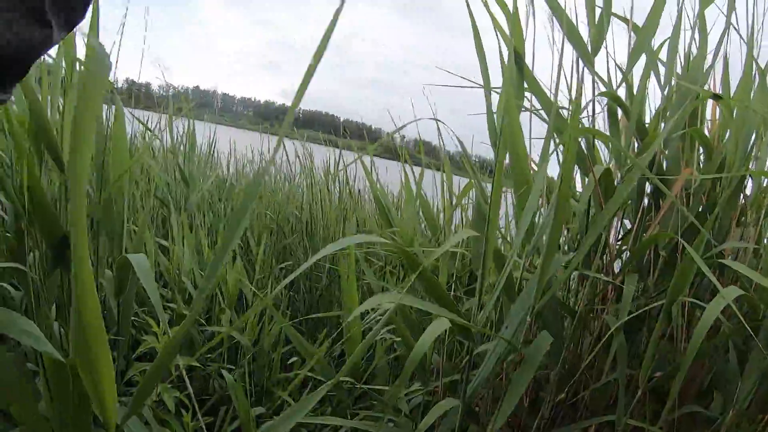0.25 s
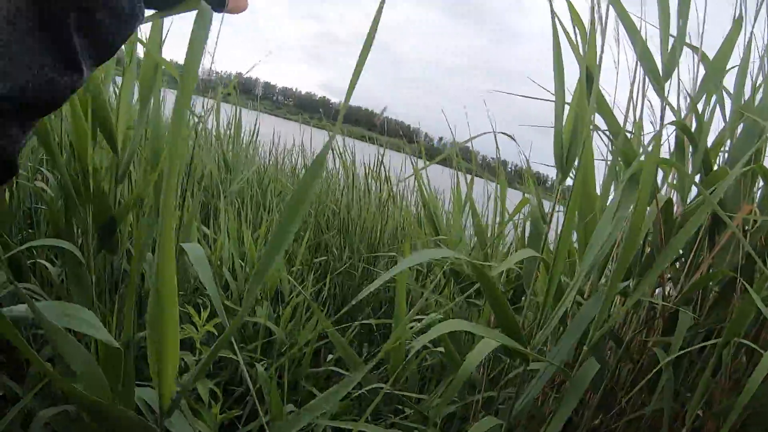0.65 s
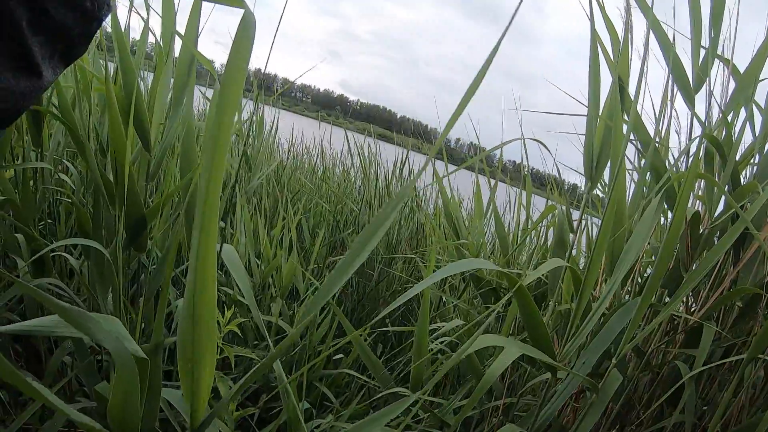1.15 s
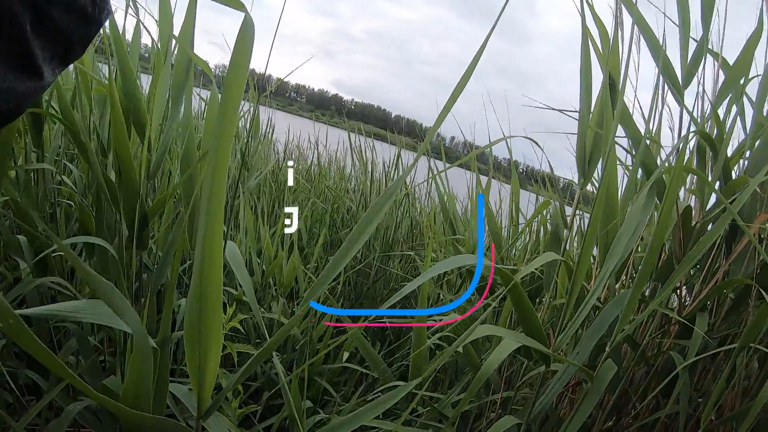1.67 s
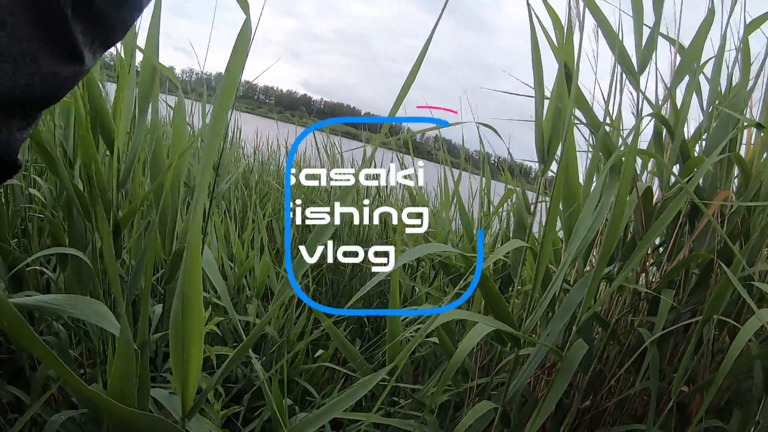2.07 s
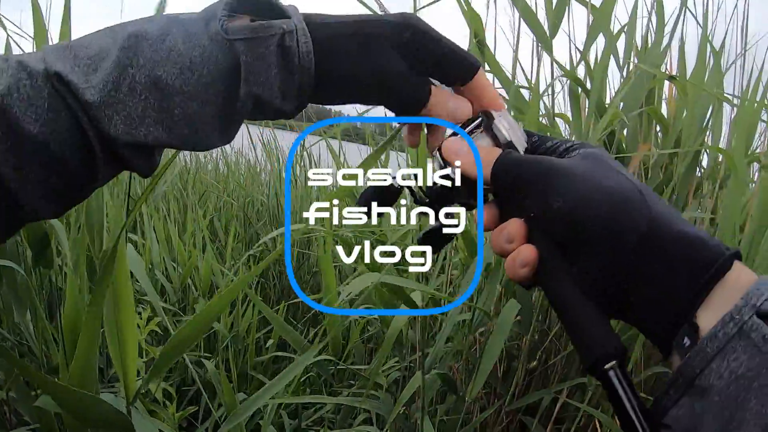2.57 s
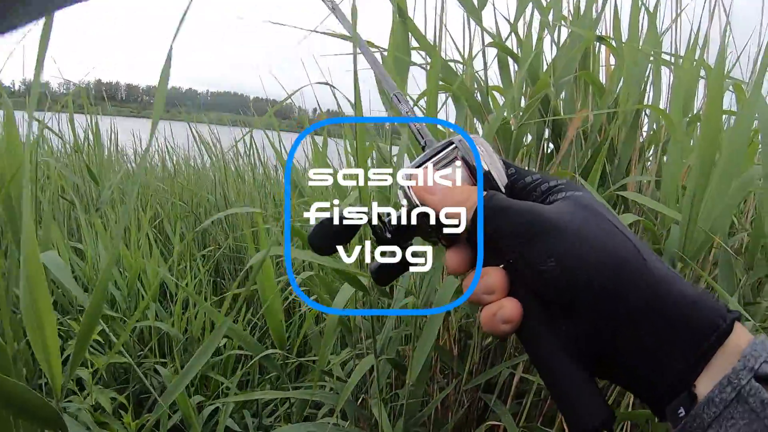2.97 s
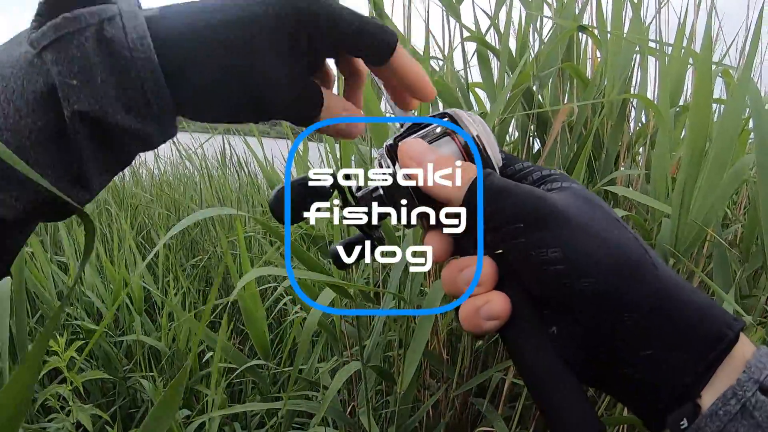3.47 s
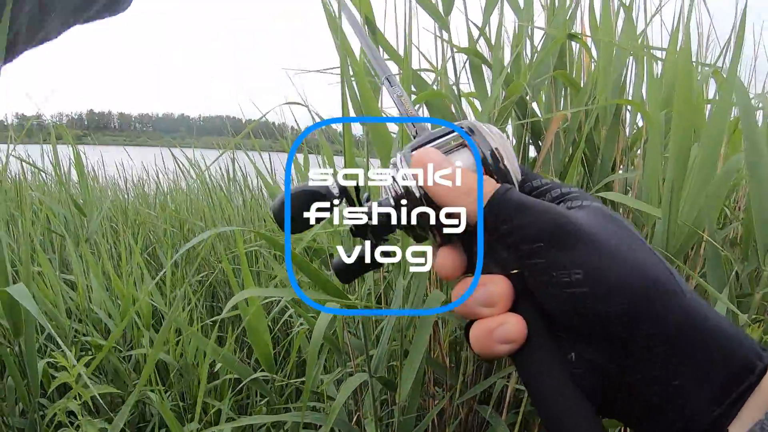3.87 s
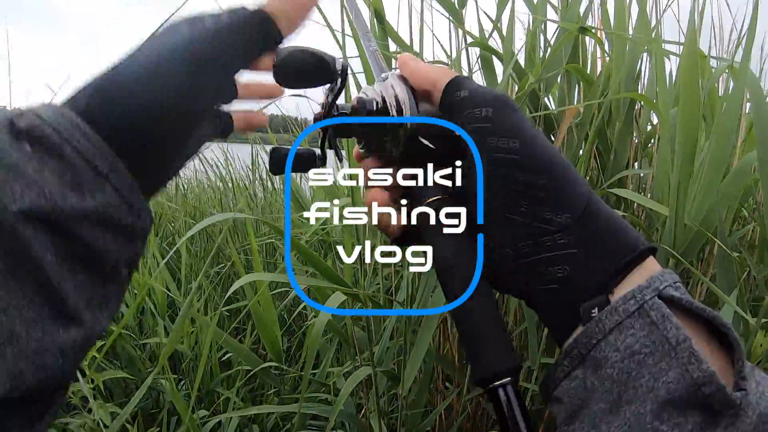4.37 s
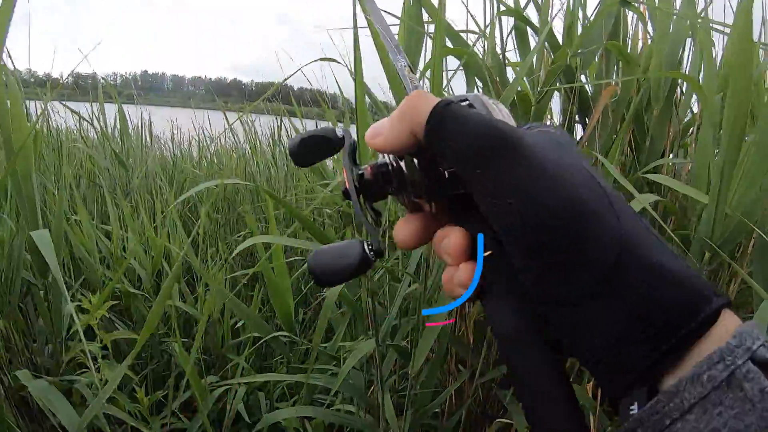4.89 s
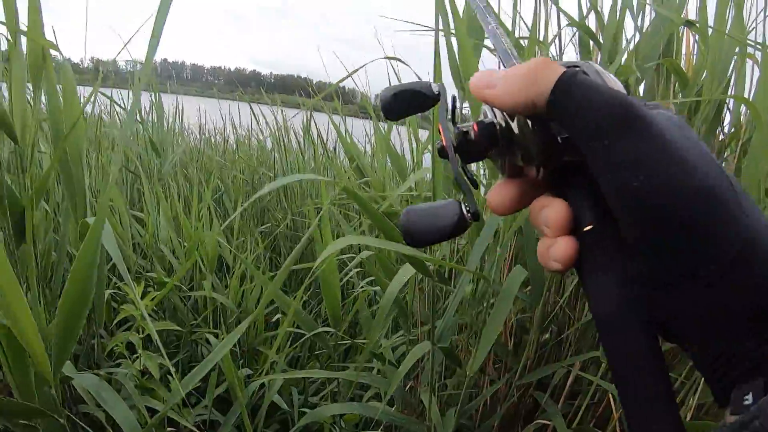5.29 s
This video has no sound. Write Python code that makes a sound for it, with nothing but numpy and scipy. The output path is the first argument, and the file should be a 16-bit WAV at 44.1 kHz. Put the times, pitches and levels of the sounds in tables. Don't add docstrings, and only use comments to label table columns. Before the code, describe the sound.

Close, quiet handling sounds among tall reeds: uneven dry rustling, sleeve scuffs, dull camera bumps and small knocks, over low lumpy wind and a barely heard distant drone. Midway, bright line ticks come in two clusters with heavier cloth rubbing between and after. A sharp metal reel click stands out late, then crisp taps and faint bird chirps close over continuing leaves. Open air, no room echo.

```python
import sys
import numpy as np
from scipy import signal
from scipy.fft import rfft, irfft, next_fast_len
from scipy.io import wavfile
from scipy.ndimage import uniform_filter1d

SR = 44100
rng = np.random.default_rng(int(sys.argv[2]) if len(sys.argv) > 2 else 0)


def elevation(decibels):
    levels = np.asarray(decibels, float)
    return 10 ** (levels / 20)


def pcm_store(signal):
    levels = np.round(np.clip(np.atleast_2d(signal), -1, 1) * 32767)
    wavfile.write(sys.argv[1], SR, levels.astype(np.int16).T)


N = 244024
SIZE = next_fast_len(N)
MEAN_SWAY_DB = -57


def in_time(rows):
    s, *columns = np.transpose(rows)
    return [np.interp(np.arange(N) / SR, s, c) for c in columns]


def at_hz(points, hz):
    f, value = np.transpose(points)
    return np.interp(np.log(hz + 1), np.log(f + 1), value)


def rms_one(x):
    return x / np.sqrt(np.mean(x ** 2) + 1e-20)


def drift(rate):
    pole = np.exp(-80 * np.pi * rate / SR)
    noise = rng.standard_normal(N // 40 + 2002)
    slow = signal.lfilter([1], [1, -2 * pole, pole * pole], noise)[2000:]
    return np.interp(np.arange(N) / 40, np.arange(len(slow)), rms_one(slow))


def ring(clicks, hz, t60_s):
    r = elevation(-60 / (t60_s * SR))
    w = 2 * np.pi * min(hz, 0.45 * SR) / SR
    return signal.lfilter([0, np.sin(w)], [1, -2 * r * np.cos(w), r * r], clicks)


def ports(shared, own):
    # frequency in Hz, phase by which the left leads in radians.
    port_phase = [(0, 0), (430, .2), (1290, 3.1), (1700, 5.4), (2240, 6.1), (4130, 6.6), (6000, 5.3),
                  (10100, 7.8), (16000, 7)]
    # frequency in Hz, share common to both ports 0-1.
    likeness = [(60, .8), (250, .7), (640, .45), (1400, .65), (3000, .6), (7000, .5), (14000, .3)]
    hz = np.fft.rfftfreq(SIZE, 1 / SR)
    alike = np.clip(at_hz(likeness, hz), 0, 1)
    left = rfft(shared, SIZE)
    common = alike * left * np.exp(-1j * at_hz(port_phase, hz))
    return np.array([left, common + np.sqrt(1 - alike ** 2) * rfft(own, SIZE)])


def grains(per_s, spread_db, decay_s):
    born = rng.random(N) < per_s * elevation(3 * drift(8)) / SR
    sizes = elevation(spread_db * np.minimum(rng.exponential(1, N), 4)) * born
    return 1 + signal.lfilter([1], [1, -np.exp(-1 / (decay_s * SR))], sizes)


def patches(spectrum, envelope, patchy_db, rate, bands_count):
    hz = np.fft.rfftfreq(SIZE, 1 / SR)
    low_hz, high_hz = spectrum[0][0], spectrum[-1][0]
    noise = ports(*(rng.standard_normal((2, N)) * envelope)) * elevation(at_hz(spectrum, hz))
    noise *= (hz > low_hz) & (hz < high_hz)
    place = bands_count * np.log(hz / low_hz + 1e-9) / np.log(high_hz / low_hz)
    total = np.zeros((2, N))
    for k in range(bands_count + 1):
        weight = np.clip(1 - np.abs(place - k), 0, 1)
        total += irfft(noise * weight, SIZE)[:, :N] * elevation(patchy_db * drift(rate))
    return rms_one(total)


def evened(x, span_s):
    power = uniform_filter1d(np.mean(np.atleast_2d(x) ** 2, axis=0), size=round(span_s * SR))
    return x / np.sqrt(power + 0.015)


def swells(s, hold_s, level_db, rise_db_per_s, fall_db_per_s, bed_db):
    t = np.arange(0, N, 64) / SR
    s = s[:, None]
    before_db = (s - t) * rise_db_per_s
    after_db = (t - s - np.abs(hold_s)[:, None]) * fall_db_per_s
    below_db = np.maximum(0, np.maximum(before_db, after_db))
    power = np.sum(elevation(level_db[:, None] - below_db) ** 2, axis=0)
    return 10 * np.log10(np.interp(np.arange(N) / SR, t, power) + elevation(bed_db) ** 2)


def add(track, s, sound, pan_db):
    at = round(s * SR)
    track[:, at:at + len(sound)] += elevation([[pan_db / 2], [-pan_db / 2]]) * sound[:N - at]


def wind():
    # start in seconds, hold in seconds, level in dB.
    gusts = [(0.04, 0.017, -47), (0.257, 0.018, -54), (0.48, .01, -55), (0.59, .22, -49.5),
             (0.93, 0.12, -48), (1.484, 0.25, -56.5), (1.795, 0.1, -53), (2.073, .05, -48.5),
             (2.345, .08, -46.5), (2.568, .02, -49.5), (2.76, .03, -48), (3.004, 0.09, -46.5),
             (3.34, 0.02, -39.5), (3.464, 0.083, -46.5), (3.69, .01, -46.5), (3.803, 0.11, -46.5),
             (4.136, .08, -55), (4.319, 0.017, -36), (5.004, 0.068, -57.5), (5.138, .29, -53.5),
             (5.52, .01, -53)]
    # time in seconds, level in dB.
    breeze = [(0, -57), (.85, -55.5), (.93, -63.5), (3.3, -52.5), (3.45, -57.5), (4.15, -53.5),
              (4.28, -51.5), (4.7, -55.5), (4.9, -59), (5.53, -57)]
    # frequency in Hz, density in dB per Hz.
    thump_spectrum = [(20, -31), (30, -20), (42, -5), (55, 4), (68, -10), (85, -19.5), (130, -17.5)]
    air_spectrum = [(41, -70), (70, -2.5), (102, -19.5), (124, -10.5), (161, -2), (192, -6), (609, -16.5),
                    (1050, -12), (1200, -17), (1560, -18), (2640, -120)]
    thump_db = swells(*np.transpose(gusts), rise_db_per_s=214, fall_db_per_s=196, bed_db=-64.5)
    thump = elevation(thump_db) * evened(patches(thump_spectrum, 1, patchy_db=4.0, rate=33, bands_count=1), 0.049)
    puffs = grains(30, 0.13, 0.0045)
    air = elevation(in_time(breeze)[0] + 4.0) * patches(air_spectrum, puffs, patchy_db=1.46, rate=24, bands_count=3)
    return thump * elevation([[-1.2], [1.2]]) + air


def drone():
    # time in seconds, low line in dB, whine in dB.
    engine = [(0.0, -69, -85), (0.52, -64, -57), (0.71, -59, -80), (1.19, -64.5, -64), (2.39, -49, -67),
              (3.27, -62.5, -54), (3.51, -58.5, -67), (4.39, -69, -55), (4.53, -62, -52), (4.95, -75, -56),
              (5.39, -55, -56.5), (5.53, -62, -88)]
    low_hz, whine_hz = 100, 430.4
    low_db, whine_db = in_time(engine)
    low, whine = rng.standard_normal((2, N))
    low = ring(ring(low, low_hz, 0.47), low_hz, 0.21)
    whine = ring(ring(whine, whine_hz, 0.061), whine_hz, 0.072)
    return elevation(low_db - 0.5) * evened(rms_one(low), 0.2) + elevation(whine_db - 9) * rms_one(whine)


def leaf_db(follow, dry_share):
    # time in seconds, level in dB, dryness in dB.
    sway = [(0, -69, -4), (.2, -53.5, -7.5), (.39, -60.5, -5), (.72, -52.5, -6.5), (.9, -66, -7),
            (1.22, -68, -4), (1.75, -64, -6), (2.05, -61.5, -5.5), (2.3, -56.5, -1.5), (2.55, -55, 2),
            (2.74, -60.5, -3), (2.93, -54, -0.5), (3.5, -57.5, -7), (3.85, -53, -2), (4.18, -60.5, -2.5),
            (4.6, -62.5, -4), (4.75, -55, -4), (5.53, -55.5, -3)]
    # start in seconds, hold in seconds, level in dB, dryness in dB.
    brushes = [(0, 0.04, -50.5, -4), (0.096, 0.042, -54, 1.5), (0.655, .02, -51.5, -7),
               (0.78, .06, -49.5, -5.5), (0.923, 0.01, -56.5, -3), (0.962, 0.018, -57, -8),
               (1.08, 0.022, -57.5, -8.5), (1.338, .03, -59, -31), (1.427, 0.074, -59.5, -11),
               (1.613, 0.04, -60.5, -3), (2.092, 0.027, -59.5, -17), (2.264, 0.03, -60, -18),
               (3.21, 0.17, -55, -0.5), (3.324, 0.11, -55.5, -12), (3.64, 0.024, -51.5, -6),
               (3.942, 0.066, -51, -6), (4.082, 0.014, -56.5, -2), (4.238, 0.023, -48.5, -2),
               (4.304, .06, -50, -4), (4.454, 0.066, -56.5, -2), (4.62, 0.009, -58.5, -7),
               (4.71, 0.029, -57.5, -6), (5.103, 0.041, -49, -6), (5.16, 0.13, -53, -6), ]
    sway_db, dry_db = in_time(sway)
    s, hold_s, level_db, brush_dry_db = np.transpose(brushes)
    moving_db = swells(s, hold_s, level_db + dry_share * brush_dry_db,
                       rise_db_per_s=398, fall_db_per_s=262, bed_db=sway_db + dry_share * dry_db)
    return MEAN_SWAY_DB + follow * (moving_db - MEAN_SWAY_DB)


def crackle(per_s, cycles):
    born = rng.random(N) < per_s * elevation(4 * drift(7)) / SR
    sizes = elevation(2.2 * np.minimum(rng.exponential(1, N), 4)) * rng.choice([-1, 1], N) * born
    dealt = rng.integers(0, 16, N)
    pans_db = rng.normal(0, 5, 16)
    both = np.zeros((2, N))
    for k, hz in enumerate(np.geomspace(1200, 7500, 16)):
        leaf = ring(sizes * (dealt == k) + 1e-18, hz, cycles / hz)
        both += leaf * elevation([[pans_db[k]], [-pans_db[k]]])
    return rms_one(signal.sosfilt(signal.butter(4, 7000, fs=SR, output="sos"), both))


def rustle():
    # start in seconds, hold in seconds, level in dB.
    strokes = [(0.015, 0.012, -49), (0.284, 0.02, -48.5), (.33, 0.038, -51), (0.467, 0.26, -57),
               (0.707, 0.025, -50), (.775, .05, -52), (2.34, .02, -57), (2.52, 0.081, -53.5),
               (2.87, 0.1, -48), (3.025, 0.0088, -38), (3.063, 0.018, -41), (3.175, 0.055, -43.5),
               (3.333, .04, -48.5), (3.853, .04, -47), (3.91, 0.021, -44.5), (3.964, 0.052, -40.5),
               (4.095, 0.052, -50), (4.211, 0.039, -44.5), (4.303, 0.087, -38.5), (4.548, .015, -53),
               (4.614, 0.016, -54), (4.725, 0.032, -50), (4.85, 0.05, -59), (5.008, 0.032, -49),
               (5.126, 0.011, -50), (5.342, .015, -49)]
    # frequency in Hz, density in dB per Hz.
    rub_spectrum = [(900, -31), (1150, -13.5), (1290, -1.5), (1450, -10.5), (1650, -9.5), (1950, -10.5),
                    (2300, -23.5), (2900, -55)]
    stem_spectrum = [(1900, -7), (2300, -1), (2700, -4), (3100, -6.5), (3600, -9.5), (4700, -32.5)]
    blade_spectrum = [(2700, 0), (3600, -3), (4500, -3), (5600, -4), (6600, -6), (8000, -13.5)]
    edge_spectrum = [(3710, -69), (6300, -8), (7010, -6), (9780, 0.5), (11700, -18.5), (14300, -18),
                     (15700, -38)]
    stem_db = leaf_db(0.47, -0.13)
    blade_db = leaf_db(0.97, 0)
    edge_db = leaf_db(1, 1)
    rest_db = -58.5 + 0.46 * (blade_db - MEAN_SWAY_DB)
    rub_db = swells(*np.transpose(strokes), rise_db_per_s=900, fall_db_per_s=800, bed_db=rest_db)
    contacts = grains(150, 2.37, 0.0033)
    rub = patches(rub_spectrum, contacts ** 0.32, patchy_db=-0.6, rate=28, bands_count=2)
    stems = patches(stem_spectrum, contacts ** 0.6, patchy_db=2.1, rate=7, bands_count=2)
    blades = patches(blade_spectrum, contacts ** 0.3, patchy_db=2.5, rate=20.3, bands_count=2)
    edges = patches(edge_spectrum, contacts ** 0.76, patchy_db=0.6, rate=57, bands_count=3)
    plant = elevation(stem_db + 1.0) * stems + elevation(blade_db + 1.1) * blades + elevation(edge_db + 0.5) * edges
    return elevation(rub_db + 1.5) * rub + plant + elevation(blade_db - 2.5) * crackle(400, cycles=17.6)


def taps():
    # start in seconds, peak in dB, centre in Hz, crack in dB.
    tap_rows = [(0.0144, -47, 1710, -53), (0.203, -43, 1280, -36), (0.291, -47, 1280, -60),
                (0.474, -40, 1250, -56), (0.5437, -43, 1260, -54), (0.585, -42.5, 1250, -56),
                (0.7088, -38, 1630, -50), (0.778, -41, 1610, -48), (1.042, -48, 1270, -56),
                (1.261, -47, 1220, -59), (1.9854, -45, 1310, -60), (2.099, -37.5, 1250, -51),
                (2.348, -41, 1870, -53), (2.8653, -46, 1780, -37), (3.7839, -37.5, 1620, -41),
                (3.8446, -36.5, 1540, -25.5), (3.91, -36, 1310, -49), (4.3, -39, 900, -55),
                (4.4718, -36.5, 1570, -49), (4.6235, -40, 2360, -34.5), (5.0113, -36, 1285, -19.5),
                (5.1327, -31, 1760, -18), (5.3468, -43, 2090, -38)]
    snap_rows = [
        (2.2942, -29, 3000, -38),
        (5.1329, -33, 2900, -40),
        (4.4858, -33, 2150, -70),
        (4.4862, -35, 790, -70),
    ]
    rows = [*tap_rows, *snap_rows]
    out, click = np.zeros((2, N)), signal.unit_impulse(3000)
    crack_decay = np.exp(-np.arange(3000) / SR / 0.00095)
    above = signal.butter(2, [1700, 11500], "band", fs=SR, output="sos")
    for (s, peak_db, hz, crack_db), hiss in zip(rows, rng.standard_normal((len(rows), 3000))):
        t60_s = 0.033 * min(1, (1250 / hz) ** 1.9)
        body = ring(ring(click, hz, 0.0017), hz, t60_s)
        crack = signal.sosfilt(above, (hiss + 2.4 * click) * crack_decay)
        add(out, s, elevation(peak_db - 1.5) * body / np.max(body) + elevation(crack_db - 4.0) * crack, 1.5)
    return out


def swishes():
    # start in seconds, length in seconds, centre in Hz, level in dB.
    sweeps = [(0.101, 0.062, 5500, -42.5), (.785, 0.021, 3430, -42.5), (1.309, 0.24, 2600, -54),
              (4.23, 0.033, 9200, -69), (4.798, 0.13, 624, -51.5), (5.35, 0.02, 6200, -44)]
    out = np.zeros((2, N))
    for (s, length_s, hz, level_db), noise in zip(sweeps, rng.standard_normal((len(sweeps), SR // 2))):
        octave = signal.butter(2, [hz / 1.29, hz * 1.23], "band", fs=SR, output="sos")
        band = rms_one(signal.sosfilt(octave, noise))
        swell = np.hanning(round(length_s * SR))
        add(out, s, elevation(level_db) * swell * band[-len(swell):], 0)
    return out


def bumps():
    # start in seconds, peak in dB, pitch in Hz.
    thuds = [(0.497, -41, 220), (0.776, -41, 220), (3.07, -43, 26), (3.313, -30.5, 131), (3.859, -43, 26),
             (4.24, -33, 160), (4.3, -38, 260)]
    out, click = np.zeros((2, N)), signal.unit_impulse(SR // 4)
    for s, peak_db, hz in thuds:
        add(out, s, elevation(peak_db) * ring(click, hz, 5.5 / hz), -1.5)
    return out


def insect():
    # time in seconds, level in dB.
    buzz = [(2.11, -79), (2.148, -52.5), (2.19, -56.5), (2.26, -58), (2.3, -74), (2.33, -97)]
    buzz_hz, throbs_per_s = 2946, 38
    phase = 2 * np.pi * np.cumsum(throbs_per_s * elevation(drift(19))) / SR
    throb = 1 + 0.37 * np.sin(phase)
    line = ring(ring(rng.standard_normal(N), buzz_hz, 0.011), buzz_hz, 0.007)
    return elevation(in_time(buzz)[0]) * throb * rms_one(line)


def ticks():
    # start in seconds, peak in dB.
    slips = [(2.8643, -45), (2.868, -30.5), (2.888, -40), (2.9073, -36), (2.925, -31.5), (2.9426, -36),
             (2.9515, -36), (2.9554, -44), (2.9656, -36), (2.9718, -37.5), (2.978, -44), (2.9904, -42),
             (3.019, -36.5), (3.034, -35.5), (3.3688, -32.5), (3.759, -48), (3.784, -35), (3.807, -43),
             (3.815, -31), (3.826, -33), (3.8437, -36), (3.8545, -30), (3.865, -32), (3.8822, -37),
             (3.8912, -32), (3.894, -41), (3.905, -34), (3.9124, -30), (3.9432, -36), (4.035, -39)]
    out, click = np.zeros((2, N)), signal.unit_impulse(400)
    for (s, peak_db), hz in zip(slips, rng.uniform(7600, 10500, len(slips))):
        tick = ring(click, hz, 0.0021) + 0.39 * ring(click, 0.63 * hz, 0.00055)
        add(out, s, elevation(peak_db + 4.5) * tick, 4.5)
    return out


def bird():
    # start in seconds, length in seconds, start, middle and end pitch in Hz.
    chirps = [(3.688, .02, 3000, 2600, 2200), (3.712, .016, 2800, 2650, 2400),
              (3.733, .016, 2800, 2700, 2500), (4.896, .035, 1900, 2600, 1900),
              (4.992, .022, 3250, 3050, 2600), (5.144, .036, 2450, 3050, 2900),
              (5.315, .05, 2250, 2100, 2150)]
    out = np.zeros((2, N))
    for s, length_s, start_hz, mid_hz, end_hz in chirps:
        u = np.linspace(0, 1, round(length_s * SR))
        pitch_hz = np.polyval(np.polyfit([0, 0.5, 1], [start_hz, mid_hz, end_hz], 2), u)
        level_db = -48.5 + 18 * np.log2(mid_hz / 2500)
        note = np.sin(np.pi * u) ** 0.15 * np.sin(2 * np.pi * np.cumsum(pitch_hz) / SR)
        add(out, s, elevation(level_db) * note, 1.5)
    return out


def clutch():
    # start in seconds, strength in dB, brightness in dB per octave, rattle decay in seconds.
    blows = [
        (4.506, -48, -1.5, 0.0012),
        (4.51, -43, 7, 0.00059),
        (4.5168, -43, 0, 0.0013),
        (4.5221, -18, 3, 0.0004),
        (4.5237, -28.5, 1, 0.0028),
        (4.535, -51.5, 9.5, 0.0022),
        (4.532, -42, -5.5, 0.0068),
    ]
    # frequency in Hz, level in dB, t60 in seconds.
    reel = [(369, -16.5, 0.048), (430, -22.5, 0.19), (683, -10.5, 0.04), (780, -7.5, 0.038),
            (1010, -3, 0.014), (1310, -5, 0.018), (1570, 3.5, 0.01), (2230, 2.5, 0.0047),
            (2720, 0.5, 0.0063), (3380, -13, 0.019), (3790, -8, 0.012), (4400, -3.5, 0.012),
            (5230, -7, 0.0044), (7300, -5, 0.0073), (8400, -5.5, 0.012), (9300, -11.5, 0.012),
            (9700, -16, .008), (10100, -7, 0.0078), (14200, -14, 0.0052)]
    start_s, length = 4.5, 8000
    out = np.zeros((2, N))
    t = np.arange(length) / SR
    shared, *own = rng.standard_normal((3, len(blows), length))
    s, strength_db, bright_db, decay_s = np.transpose(blows)[:, :, None]
    since = t - (s - start_s)
    dying = elevation(strength_db) * (since >= 0) * np.exp(-np.maximum(since, 0) / decay_s)
    blow = 4.03 * (since < 1 / SR)
    at = round(start_s * SR)
    for side, apart in zip(out, own):
        rattles = dying * (blow + 0.67 * shared + 1.17 * apart)
        for k, (hz, level_db, t60_s) in enumerate(reel):
            drive = np.sum(elevation(bright_db * np.log2(hz / 2000)) * rattles, axis=0)
            side[at:at + length] += (-1) ** k * elevation(level_db - 11.5) * ring(drive, hz, t60_s)
    return out


def scene():
    beds = wind() + drone() + rustle() + swishes() + bumps() + insect() + bird()
    hits = taps() + ticks() + clutch() * elevation([[0.8], [-0.8]])
    hits[1] = 0.93 * hits[1] + 0.047 * np.roll(hits[1], 7)
    hits = signal.sosfilt(signal.butter(2, 280, "high", fs=SR, output="sos"), hits)
    dulled = signal.sosfilt(signal.butter(6, 10400, fs=SR, output="sos"), hits)
    return beds + dulled + elevation(-23) * hits


def roll_off(x):
    return signal.sosfilt(signal.butter(12, 16470, fs=SR, output="sos"), x)


def record(dry):
    cut = signal.sosfilt(signal.cheby2(12, 50, 16200, fs=SR, output="sos"), dry)
    return roll_off(cut)


dry = scene()
out = record(dry)
pcm_store(out)
```